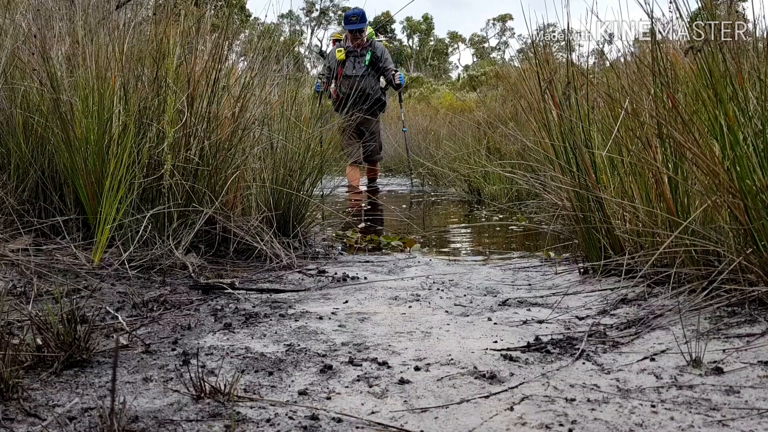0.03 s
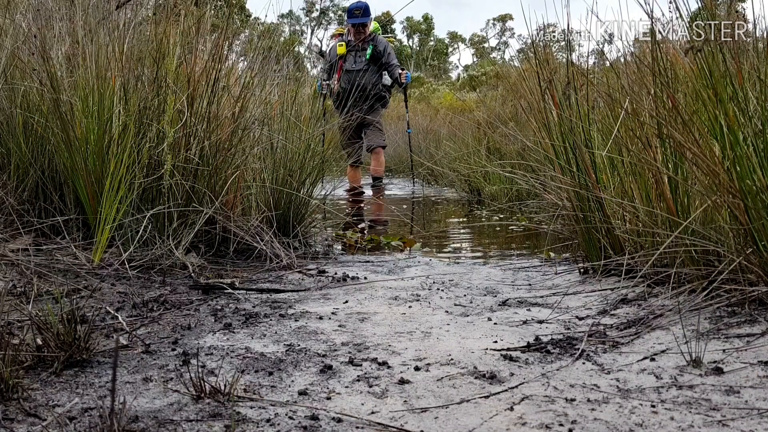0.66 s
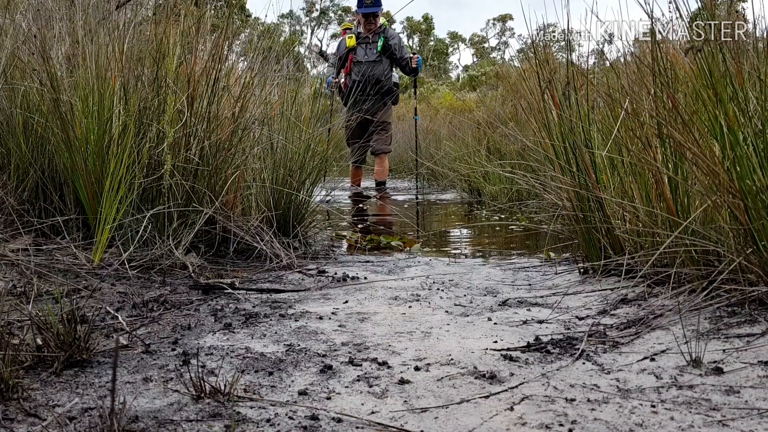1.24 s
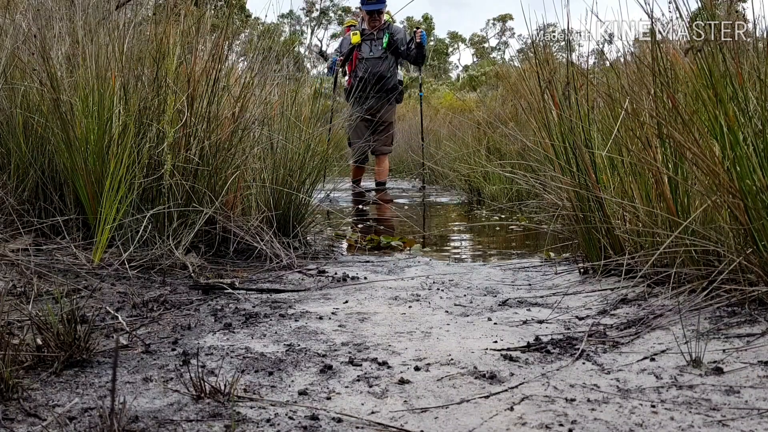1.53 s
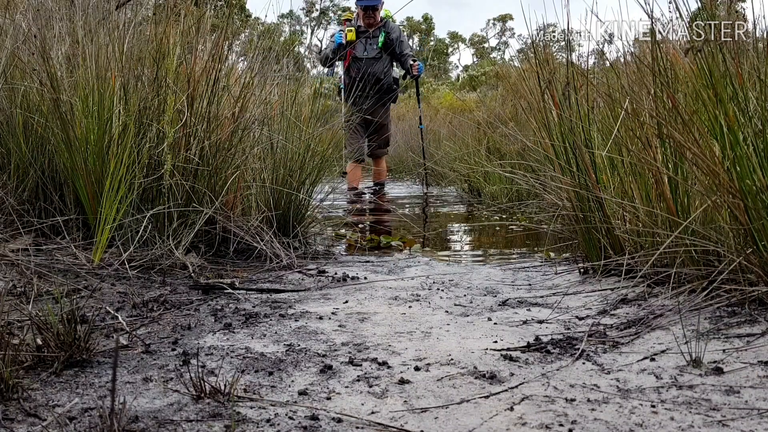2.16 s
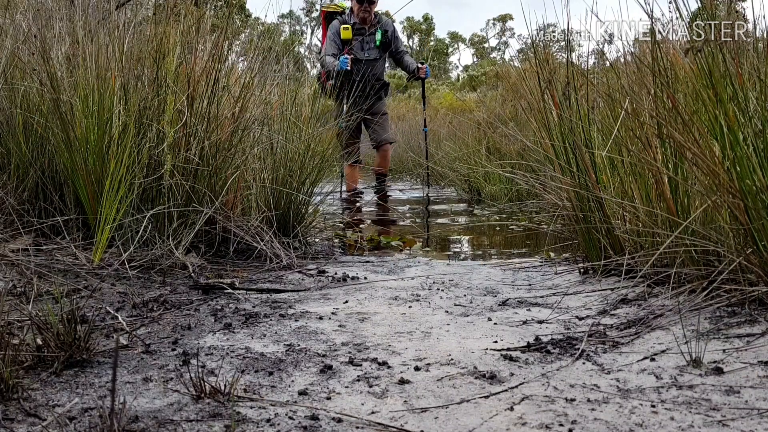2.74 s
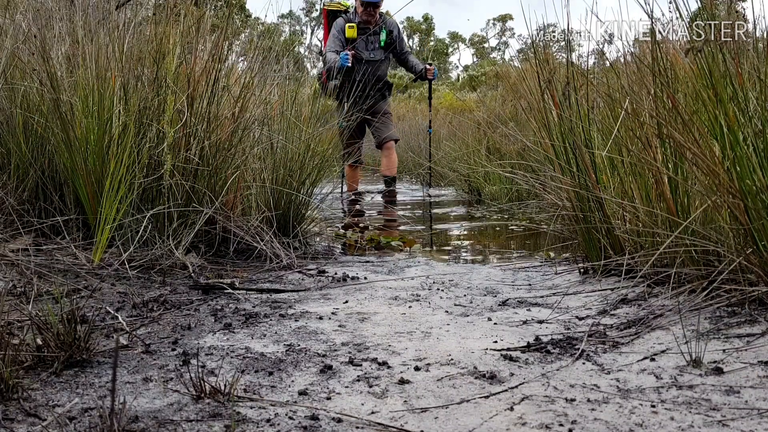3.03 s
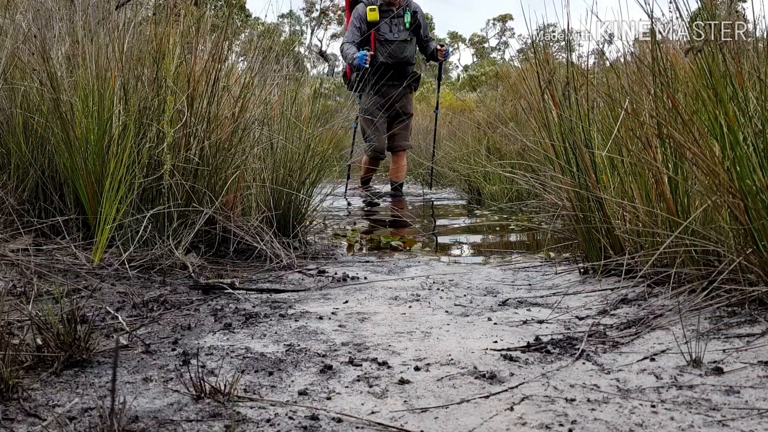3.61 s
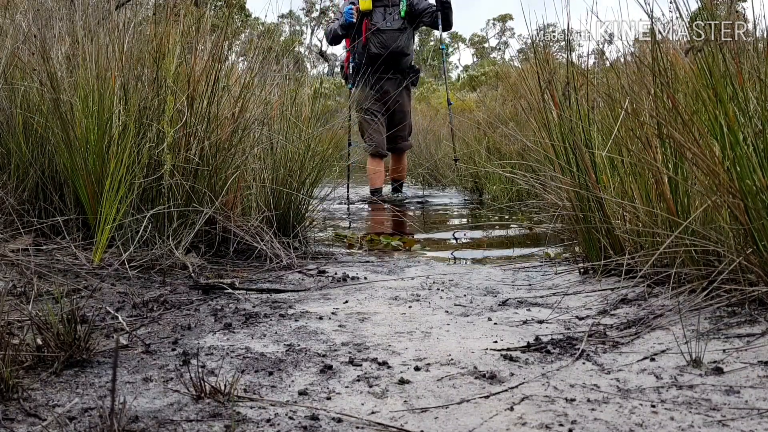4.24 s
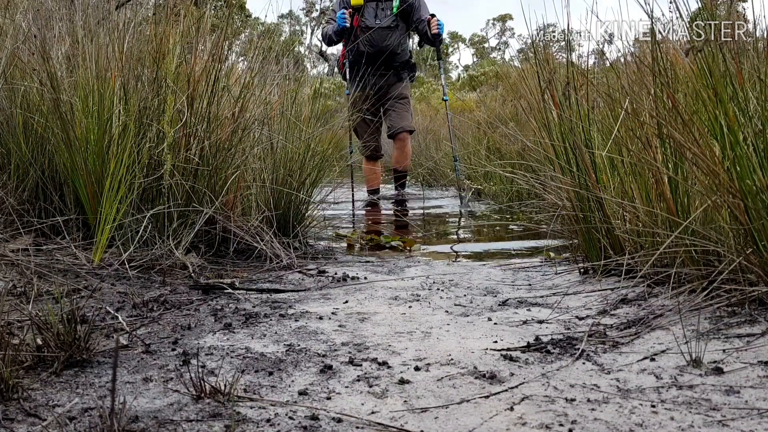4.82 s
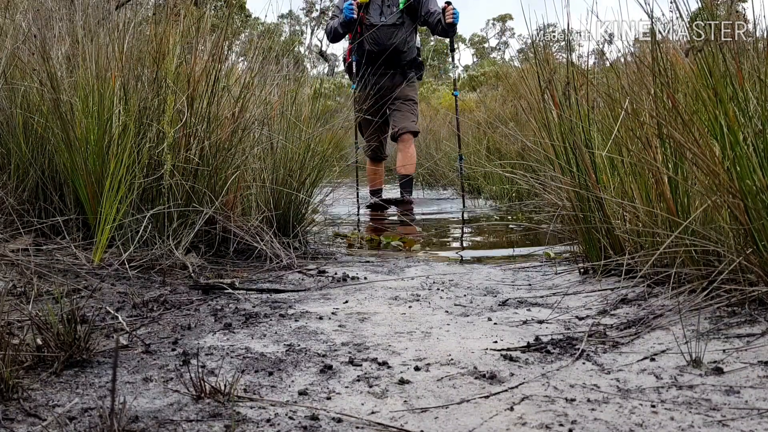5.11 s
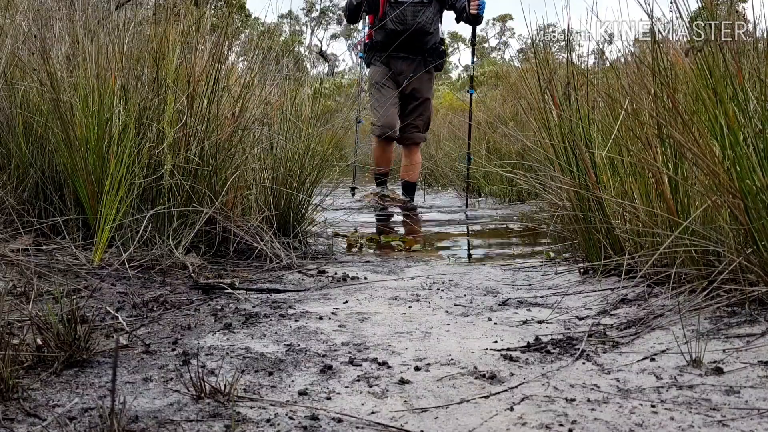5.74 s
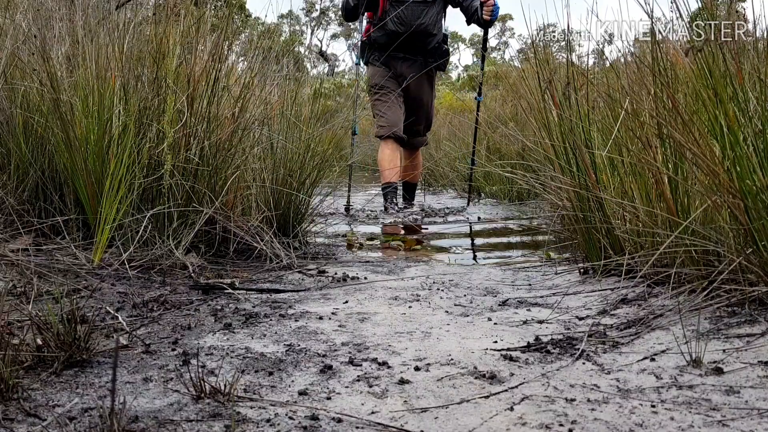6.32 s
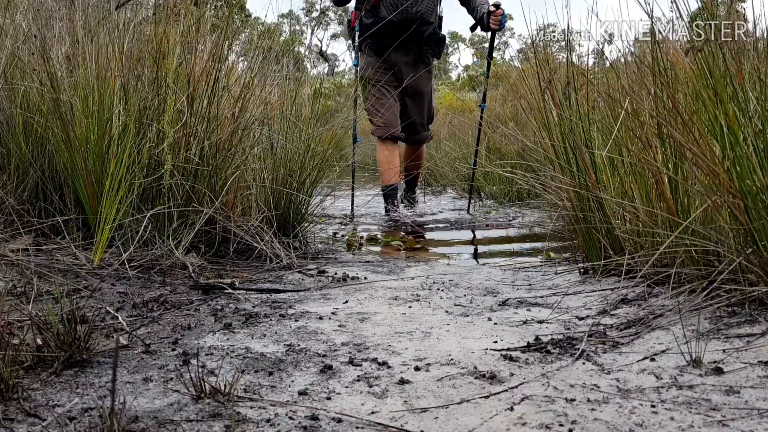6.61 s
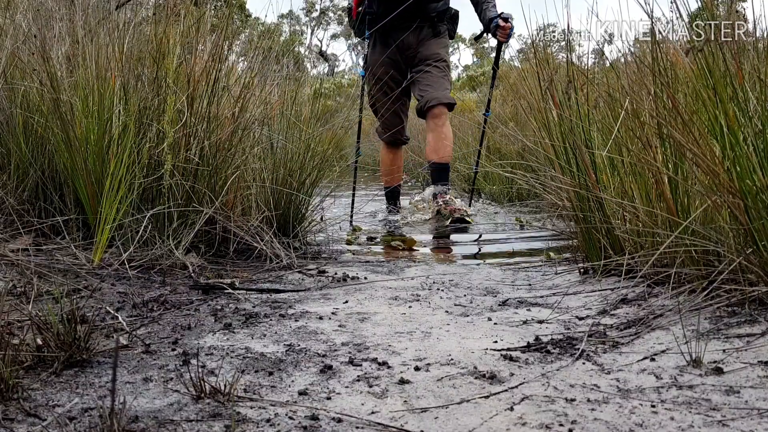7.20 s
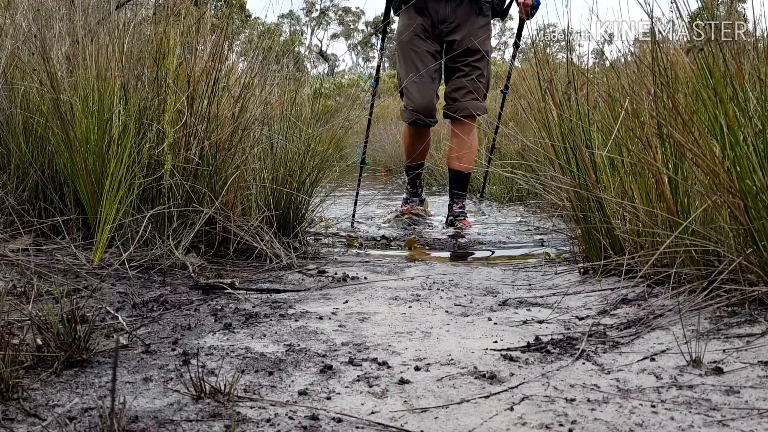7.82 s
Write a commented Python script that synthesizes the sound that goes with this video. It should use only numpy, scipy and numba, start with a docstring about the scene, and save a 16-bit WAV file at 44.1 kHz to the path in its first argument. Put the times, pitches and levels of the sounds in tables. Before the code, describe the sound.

Someone wades closer through shallow water, sloshing and gurgling louder with each stride, while a small bird chirps.

```python
"""A flooded track between reeds: a hiker with two poles wades towards the microphone.
Each stride churns up clouds of ringing bubbles and throws spray. Cavities gurgle, air pockets glug,
boots and pole tips slap the water, and footfalls thud on the soft bed.
A small bird chirps, then whistles a thin phrase in the trees, over a faint rumble of outdoor air."""
import sys
import numpy as np
from scipy import signal
from scipy.io import wavfile
from scipy.ndimage import uniform_filter1d
from numba import njit

SR = 44100
rng = np.random.default_rng(int(sys.argv[2]) if len(sys.argv) > 2 else 0)


def wrap_up_sound(samples):
    """Save the sound to the file named by the first command line argument, as 16-bit audio."""
    columns = np.atleast_2d(samples).T
    # keep every value between -1 and 1, then stretch to whole-number steps
    tamed = np.clip(columns, -1, 1)
    steps = np.round(tamed * 32767).astype(np.int16)
    wavfile.write(sys.argv[1], SR, steps)


N = 355446
TIME = np.arange(N) / SR


def from_db(db):
    """Decibels to gain."""
    return 10 ** (np.asarray(db) / 20)


def rms_one(x):
    """Scale to unit power."""
    return x / np.sqrt(np.mean(x ** 2) + 1e-20)


def at_hz(points, hz):
    """Read a curve on a log-frequency axis."""
    freqs, values = np.transpose(points)
    return np.interp(np.log(hz), np.log(freqs), values)


def band(x, low_hz, high_hz, order=2):
    """Butterworth band-pass."""
    sos = signal.butter(order, [low_hz, min(high_hz, .45 * SR)], "band", fs=SR, output="sos")
    return signal.sosfilt(sos, x + 1e-18)


def drift(rate):
    """A random wander of unit power that heads for a new value rate times a second."""
    knots = rng.standard_normal(4000)
    return rms_one(np.interp(TIME * rate, np.arange(len(knots)), knots))


def add(out, start_s, sound):
    """Mix a short sound in at its cue."""
    start = max(round(start_s * SR), 0)
    part = sound[..., :N - start]
    out[..., start:start + part.shape[-1]] += part


def air(level_db, flutter_db):
    """A soft bed of outdoor noise whose low end swells a little with the breeze."""
    # Tone of the air. Each row: frequency in Hz, relative noise density in dB.
    air_colour = [(25, -9), (50, 0.9), (100, -3), (160, -6), (250, -7), (450, -12), (900, -16), (2000, -19),
                  (4000, -23), (8000, -27), (14000, -27)]
    # Its stereo image. Each row: frequency in Hz, likeness of left and right from 0 to 1.
    air_likeness = [(40, 0.58), (200, 0.72), (1000, 0.1), (4000, 0.059), (14000, 0.1)]
    out, white = 0, rng.standard_normal((2, 2, N))
    edges_hz = np.geomspace(22, 16000, 17)
    for k, (low, high) in enumerate(zip(edges_hz, edges_hz[1:])):
        mid, side = band(white[k % 2], low, high)
        hz = np.sqrt(low * high)
        alike = np.clip(at_hz(air_likeness, hz), 0, 1)
        stereo = np.sqrt(1 + alike) * mid + np.sqrt(1 - alike) * side * np.array([[1], [-1]])
        breeze_db = flutter_db * min(1, 150 / hz) * drift(3.0)
        out = out + from_db(at_hz(air_colour, hz) + breeze_db) * stereo
    return from_db(level_db) * rms_one(out)


def gurgles(rough):
    """A cavity changes size as water runs in, so its unsteadily fed resonance glides."""
    # Each row: start and length in seconds, first and last pitch in Hz, level in dB.
    cavities = [(0.077, .026, 1690, 2900, -64.5), (0.184, .1, 293, 682, -65),
                (0.388, 0.1, 1050, 1250, -70.5), (0.802, 0.1, 537, 332, -56),
                (0.832, 0.0256, 1330, 2200, -51), (1.14, 0.075, 778, 1344, -60.5),
                (1.284, 0.054, 530, 695, -63.5), (1.624, .022, 750, 990, -64), (1.745, 0.16, 578, 670, -68),
                (1.895, 0.061, 544, 556, -51.5), (1.983, 0.041, 517, 548, -51),
                (2.354, 0.024, 1590, 1370, -51), (2.822, .14, 259, 860, -71),
                (3.064, 0.072, 330, 534, -52.5), (7.081, 0.047, 412, 655, -39),
                (7.89, 0.036, 319, 537, -38.5)]
    out, feed, wobble = np.zeros(N), 1 + rough * drift(180), drift(120)
    for start, length, first_hz, last_hz, db in cavities:
        progress = np.linspace(0, 1, int(length * SR))
        span = slice(int(start * SR), int(start * SR) + len(progress))
        hz = first_hz * (last_hz / first_hz) ** progress * (1 + 0.033 * wobble[span])
        envelope = from_db(db) * np.sin(np.pi * progress) * feed[span]
        add(out, start, envelope * np.sin(2 * np.pi * np.cumsum(hz) / SR))
    return out


def push(start, swell, hold, settle):
    """One leg stroke swells, holds and falls 20 dB per settle time; a negative settle leaves it on."""
    t = TIME - start
    attack = np.clip(t / swell, 0, 1) ** 1.05
    return attack * from_db(-20 * np.clip((t - swell - hold) / settle, 0, 10))


def wading():
    """Leg strokes add up in power: envelopes of churn, gulp and spray, and a bubble pitch floor in Hz."""
    # Each row: start, swell, hold and settle in seconds, churn, gulp and spray levels in dB,
    # pitch floor at full push in Hz.
    strokes = [ (0.495, .012, .17, .15, -62, -80.5, -86, 639),
               (0.6, .26, .02, 0.48, -54.5, -71.5, -72, 301),
               (1.135, .015, .01, 0.41, -63.5, -82, -81, 573),
               (1.69, .14, .12, 0.4445, -55.5, -65, -66.5, 518), (2.11, .02, .02, 0.19, -54, -64, -85, 482),
               (2.34, .13, .02, 0.01, -52.5, -62.5, -66.5, 400),
               (2.872, .21, .08, 0.14, -52.5, -70.5, -70.5, 342),
               (3.153, .06, .11, 0.42, -56.5, -70, -70, 425), (3.62, .37, .05, 0.55, -45.5, -57, -67, 316),
               (3.64, .04, .025, 0.1, -53.5, -65, -80, 495), (4.181, .08, .035, .19, -48, -60, -61, 352),
               (4.556, .22, .55, 0.48, -53.5, -69, -73, 376),
               (5.638, .02, .066, 0.24, -56.5, -67, -82, 470),
               (5.701, .28, .1, 0.59, -42, -57.5, -60, 229.6), (6.143, .11, .25, 0.15, -46, -60, -63, 357),
               (6.805, .06, .15, -0.07, -55.5, -63.5, -75.5, 519),
               (6.989, .02, .095, 0.18, -46.5, -52, -77, 215),
               (7.007, .19, .26, 0.23, -40.5, -54, -53, 171),
               (7.406, .015, .01, 0.1646, -36.5, -65, -55, 400),
               (7.57, .044, .01, 0.22, -44, -56.5, -81, 294),
               (7.818, .022, .125, 0.4, -44.5, -61, -67.5, 275),
               (7.958, .097, .1, .3, -39.5, -53, -52, 302)]
    ripple_hz = 823
    churn, gulp, thrown = from_db([-90, -100, -98.5]) ** 2  # faint ripples between strokes
    flight_s, linger = 0.0099, 1.4  # spray lands late and takes this many times as long to settle
    slack_octaves = 0.227  # bubbles shrink as a push slackens: pitch rise per halving of effort
    weighted_hz = churn * ripple_hz
    for start, swell, hold, settle, churn_db, gulp_db, spray_db, lowest_hz in strokes:
        effort = push(start, swell, hold, settle)
        landing = push(start + flight_s, swell, hold, settle * linger)
        power = (from_db(churn_db) * effort) ** 2
        churn = churn + power
        gulp = gulp + (from_db(gulp_db) * effort) ** 2
        thrown = thrown + (from_db(spray_db) * landing) ** 2
        floor_hz = np.minimum(lowest_hz / (effort + 1e-9) ** slack_octaves, ripple_hz)
        weighted_hz = weighted_hz + power * floor_hz  # the strongest push has the most say
    slop = from_db(1.32 * drift(rate=22))  # the water slops unevenly within a stroke
    flicker = from_db(1.9 * drift(rate=22))
    return slop * np.sqrt(churn), slop * np.sqrt(gulp), flicker * np.sqrt(thrown), weighted_hz / churn


@njit
def ring_bubbles(start, pitch, height, life, rise, lag, length):
    """Each bubble swells within a cycle, then dies as a gliding sine; time is counted in samples."""
    out = np.zeros((2, length))
    for k in range(len(start)):
        for i in range(min(int(life[k]), length - start[k])):
            age = i / life[k]
            phase = 2 * np.pi * pitch[k] * i * (1 + np.log(2) * rise[k] * age / 2)
            envelope = height[k] * np.exp(-np.log(1000) * age) * min(1., pitch[k] * i)
            out[0, start[k] + i] += envelope * np.sin(phase + np.pi * pitch[k] * lag[k])
            out[1, start[k] + i] += envelope * np.sin(phase - np.pi * pitch[k] * lag[k])
    return out


def bubble_cloud(busy, low_hz, high_hz, colour, cycles, size_db, clump_db, rise, spread, count):
    """Bubbles crowd where the water is busy and sharpen near the surface; the level is evened out."""
    when, place, size, damping, climb, side = rng.random((count, 6)).T
    start = np.searchsorted(np.cumsum(busy) / np.sum(busy), when).clip(0, N - 1)
    low, high = np.broadcast_to(low_hz, N)[start], np.broadcast_to(high_hz, N)[start]
    hz = low * (high / low) ** place
    life = cycles * (hz / 1000) ** 0.36 * 2 ** (2 * damping - 1) * SR / hz  # small ones ring more cycles
    accent_db = size_db * np.minimum(-np.log(1 - size), 4)  # a few bubbles stand out
    level_db = at_hz(colour, hz) + accent_db + clump_db * drift(70)[start]
    height = from_db(level_db) / np.sqrt(life)
    lag = spread * (2 * side - 1)  # samples between left and right
    cloud = ring_bubbles(start, hz / SR, height, life, rise * 2 * climb, lag, N)
    power = uniform_filter1d(uniform_filter1d(np.mean(cloud ** 2, axis=0), size=2000), size=2000)
    return cloud / np.sqrt(np.maximum(power, 0) + np.mean(power) / 100)


def strides():
    """Legs churn bubbles, a deep push traps big ones, and thrown water patters back as drips and spray."""
    # Tone of the bubbles and of the spray. Each row: pitch in Hz, relative level in dB.
    bubble_colour = [(150, 10.5), (280, -4), (450, 2), (750, 0), (1100, 3.5), (1600, 1), (2200, -3),
                     (3000, -13), (4500, -15), (7000, -18)]
    spray_colour = [(3000, 2), (4500, 2.5), (6500, 1.5), (8500, -8), (11500, 0), (14500, -7.5)]
    churn, gulp, thrown, floor_hz = wading()
    busy = churn ** .3  # gentle water gives separate bubbles, a hard stroke a dense rush
    patter = churn ** 0.19 * thrown ** .85
    gulps = bubble_cloud(busy, floor_hz, floor_hz + 330, bubble_colour, count=2200,
                         cycles=31.5, size_db=3.5, clump_db=1.5, rise=0.34, spread=9.5)
    slosh = bubble_cloud(busy, floor_hz + 200, 2926, bubble_colour, count=5400,
                         cycles=41.8, size_db=3.5, clump_db=1.5, rise=0.602, spread=1.6)
    drips = bubble_cloud(busy, 1750, 6200, bubble_colour, count=2000,
                         cycles=36, size_db=5.5, clump_db=1.0, rise=0.34, spread=3.0)
    fizz = bubble_cloud(busy, 2915, 7200, bubble_colour, count=20000,
                        cycles=13.3, size_db=4.0, clump_db=4.5, rise=0.22, spread=2.84)
    spray = bubble_cloud(busy, 6450, 13660, spray_colour, count=50000,
                         cycles=15, size_db=2.5, clump_db=2.5, rise=.1, spread=2.1)
    return (from_db(-0.9) * churn * slosh
            + from_db(5.5) * gulp * gulps
            + from_db(1) * patter * drips
            + from_db(3.0) * patter * fizz
            + from_db(-1.0) * thrown * spray * from_db([[1], [-1]]))


def crack(db, hz, t60):
    """A short burst of breaking water: the brighter it is, the wider its stereo image."""
    t = TIME[:SR // 5]
    mid, side = rng.standard_normal((2, len(t)))
    noise = mid + min(hz / 7000, 1) * side * np.array([[1], [-1]])
    burst = band(noise * from_db(-60 * t / t60), hz / 1.1, hz * 1.42, order=1)
    burst = band(burst, hz / 4, 6700, order=1)  # a small splash moves too little air for bass
    return from_db(db) * burst / np.abs(burst).max()


def slaps():
    """Boots and pole tips break the surface with a crack and a hissing tail of fine spatter."""
    # Each row: start in seconds, peak in dB, brightness in Hz, 60 dB decay in seconds,
    # spatter peak in dB.
    hits = [ (.504, -55, 1560, .06, -63), (1.296, -71, 5000, .03, -50.5), (1.786, -36, 2300, 0.026, -51),
            (1.888, -37.5, 3900, 0.013, -55), (2.123, -39.5, 790, 0.038, -66),
            (2.393, -32, 4530, 0.015, -36), (2.491, -34.5, 1180, 0.02, -48),
            (4.762, -28.5, 3060, 0.013, -36.5), (4.859, -29.5, 2380, 0.016, -50),
            (4.863, -26, 1950, 0.01, -42), (5.072, -40.5, 1300, 0.017, -69),
            (6.17, -35.5, 1310, 0.089, -65.5), (6.37, -24.5, 3860, 0.009, -41),
            (6.482, -34, 2530, 0.013, -58), (6.513, -39, 6020, .03, -56), (6.867, -42.5, 1700, 0.034, -68),
            (7.002, -34, 800, 0.01, -66), (7.621, -31.5, 1990, 0.041, -54)]
    out = np.zeros((2, N))
    for start, db, hz, t60, spatter_db in hits:
        add(out, start, crack(db, hz, t60) + crack(spatter_db, hz=10900, t60=0.098))
    return out


def glugs():
    """Large pockets of air pinch off behind boots and poles, each ringing as one bending note."""
    # Each row: start in seconds, pitch in Hz, level in dB, 60 dB decay in seconds,
    # bend over that decay, roughly in octaves.
    pockets = [ (.776, 1100, -44.5, 0.032, .4), (0.835, 1164, -39.5, 0.03, 0.66),
               (.902, 710, -39.5, .033, -0.19), (.96, 960, -46, .041, -0.033),
               (1.221, 1016, -50.5, 0.047, 0.051), (1.889, 262.4, -38, 0.3, 0.11),
               (1.986, 1960, -38.5, 0.034, 0.11), (2.123, 369.4, -30, 0.13, .55),
               (2.4449, 990, -26, 0.016, -0.11), (2.449, 1150, -35.5, .04, 0.096),
               (2.492, 179, -31.5, 0.21, 0.28), (3.681, 1090, -38.5, 0.0055, -0.31),
               (3.849, 993, -34, 0.038, 0.024), (3.875, 675, -36.5, 0.056, 0.24),
               (4.112, 690, -34.5, 0.039, 0.45), (4.219, 662, -39, 0.068, 0.057),
               (4.483, 1150, -32.5, 0.006, -0.039), (4.610, 1490, -42.5, 0.019, .36),
               (4.813, 1020, -38, 0.037, 0.025), (4.911, 980, -36, 0.013, .4),
               (5.059, 657, -39, 0.024, -0.11), (5.206, 572, -44.5, 0.11, -0.36),
               (5.44, 1540, -36.5, 0.037, -0.012), (5.669, 776, -40, 0.014, 0.19),
               (5.791, 755, -35, 0.03, -.08), (6.016, 1500, -27.5, 0.022, 0.14),
               (6.128, 680, -34.5, 0.078, -0.012), (6.171, 610, -27.5, 0.018, .2),
               (6.248, 1335, -33, .032, .2), (6.348, 736, -29, .016, 0.27),
               (6.369, 1550, -15, 0.0056, 0.44), (6.478, 612, -33, .04, .1),
               (6.495, 718, -20, 0.027, -0.31), (6.868, 980, -35.5, 0.0097, .28),
               (6.951, 1290, -36, 0.024, -.1), (7.009, 404, -23.5, 0.0061, 0),
               (7.073, 353, -29.5, .058, -0.062), (7.197, 650, -19.5, 0.017, 0.15),
               (7.250, 840, -27.5, 0.042, -0.11), (7.353, 287, -24, 0.072, .35),
               (7.427, 620, -26.5, 0.021, .2), (7.623, 940, -24, 0.021, 0.19),
               (7.835, 594, -29.5, 0.028, 0.017)]
    start, hz, db, t60, rise = np.transpose(pockets).copy()
    height = from_db(db + 30 / (hz * t60))  # makes up what short rings lose while they swell
    lag = rng.normal(0, 1, len(start))
    rings = ring_bubbles((start * SR).astype(np.int64), hz / SR, height, t60 * SR, rise, lag, N)
    return band(rings, 200, 9000)  # a pocket radiates almost nothing below its own pitch


def whistle(length, first_hz, held_hz, unsteady, pan_db):
    """A thin, wavering note that slides on to its held pitch, with its own lag between left and right."""
    progress, sides = np.linspace(0, 1, int(length * SR)), np.array([[.5], [-.5]])
    waver = np.interp(progress * length * 400, np.arange(100), rng.standard_normal(100))
    slide_hz = held_hz + (first_hz - held_hz) * np.exp(-4.28 * progress)
    hz = slide_hz * (1 + unsteady * waver)
    phase = 2 * np.pi * np.cumsum(hz) / SR + sides * rng.normal(1.12, 0.4)
    envelope = np.abs(np.sin(np.pi * progress)) ** 0.74
    return envelope * np.sin(phase) * from_db(pan_db * sides)


def bird():
    """A small bird gives a few husky two-voiced chirps, then a phrase of pure notes."""
    # Each row: start in seconds, held pitch in Hz, upper and lower voice levels in dB.
    chirps = [(1.326, 6370, -63, -66), (1.505, 7820, -61, -83), (2.126, 6630, -60, -66.5),
              (2.442, 6600, -57, -67), (2.705, 6800, -64.5, -65.5)]
    # Each row: start and length in seconds, first and held pitch in Hz, level in dB,
    # left minus right in dB.
    phrase = [ (3.1, 0.026, 5520, 5650, -41.5, -0.5), (3.147, 0.043, 6250, 6064, -36.5, 1),
              (3.313, 0.015, 5400, 5700, -41, -0.5), (3.338, 0.057, 6780, 6686, -42, -10.5),
              (3.473, 0.094, 6000, 6183, -38.5, 5.5), (3.606, 0.039, 6300, 6160, -39.5, -1),
              (3.701, .08, 6033, 6110, -37, -1), (3.817, 0.041, 6060, 6105, -38, 2),
              (3.873, 0.041, 6180, 6260, -37, -2), (3.937, 0.023, 6184, 6150, -37.5, 1),
              (4.032, 0.089, 6500, 6670, -46.5, 12), (4.153, 0.019, 6420, 6900, -46.5, -9),
              (4.218, 0.028, 6900, 7125, -46, -7), (4.315, 0.13, 5830, 5550, -42, -3)]
    chirp_s, scoop, lower_hz, lower_late_s = 0.044, .93, 4760, 0.017
    out = np.zeros((2, N))
    for start, hz, upper_db, lower_db in chirps:
        upper = whistle(chirp_s, scoop * hz, hz, unsteady=0.03, pan_db=0)
        lower = whistle(chirp_s, lower_hz, lower_hz, unsteady=0.027, pan_db=-2)
        add(out, start, from_db(upper_db) * upper)
        add(out, start + lower_late_s, from_db(lower_db) * lower)
    for start, length, first_hz, held_hz, db, pan_db in phrase:
        add(out, start, from_db(db) * whistle(length, first_hz, held_hz, unsteady=0.0044, pan_db=pan_db))
    return out


def thuds():
    """The hiker's weight shakes the mud with a dull bump."""
    # Each row: start in seconds, peak in dB, 60 dB decay in seconds.
    footfalls = [(2.493, -50.5, 0.36), (5.99, -49.5, 0.21), (7.004, -60, 0.2), (7.346, -41, 0.11)]
    out, t = np.zeros(N), TIME[:SR // 3]
    for start, db, t60 in footfalls:
        bump = band(rng.standard_normal(len(t)) * from_db(-60 * t / t60), 34, 274)
        add(out, start, from_db(db) * bump / np.abs(bump).max())
    return out


def scatter(x, t60, low_hz, high_hz):
    """Countless faint reflections off stems and trunks, different on each side."""
    t = TIME[:SR]
    noise = band(rng.standard_normal((2, SR)), low_hz, high_hz, order=1)
    tail = noise * from_db(-60 * t / t60) * (1 - np.exp(-t / 0.003))
    tail /= np.sqrt(np.sum(tail ** 2, axis=1, keepdims=True))
    return signal.fftconvolve(x, tail, axes=1)[:, :N]


def scene():
    """Water among the reeds, the bird farther off among trees, and outdoor air under both."""
    water = strides() + glugs() + gurgles(rough=0.48) + slaps() + thuds()
    song = bird()
    water = water + from_db(-9.0) * scatter(water, t60=0.17, low_hz=1370, high_hz=11000)
    song = song + from_db(-8.0) * scatter(song, t60=0.51, low_hz=2960, high_hz=8900)
    return water * from_db([[.2], [-.2]]) + song + air(level_db=-70, flutter_db=1.0)


def record(dry):
    """A steep low-pass takes off the very top."""
    cutoff_hz = 14650
    return signal.sosfilt(signal.ellip(12, .1, 70, cutoff_hz, fs=SR, output="sos"), dry)


dry = scene()
out = record(dry)
wrap_up_sound(out)
```